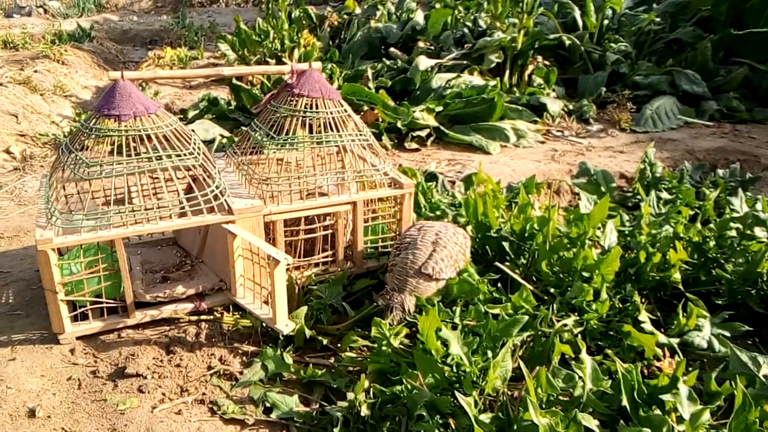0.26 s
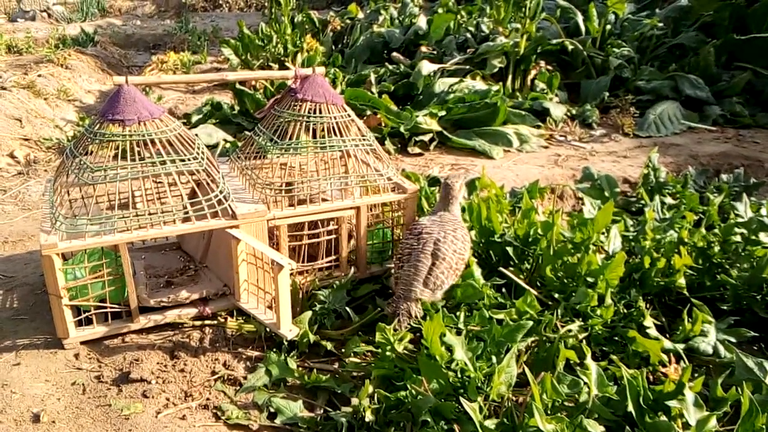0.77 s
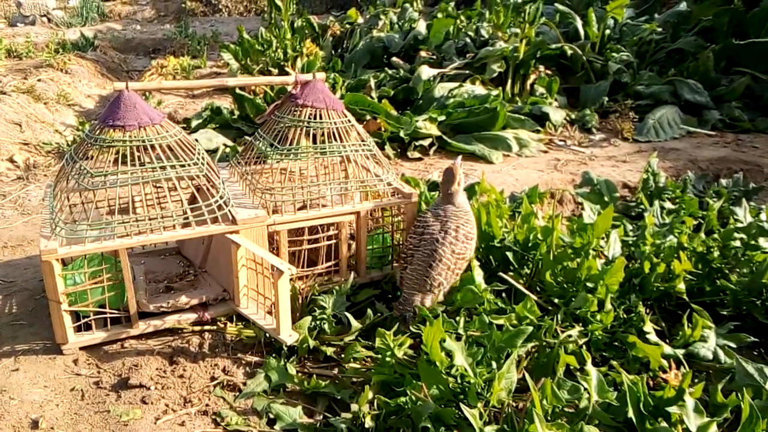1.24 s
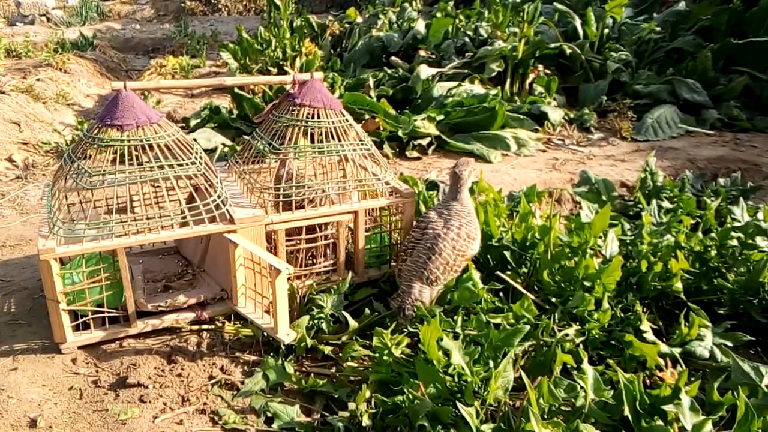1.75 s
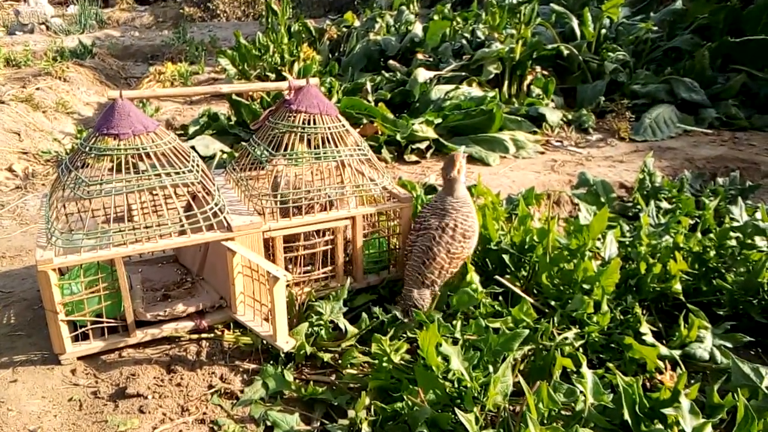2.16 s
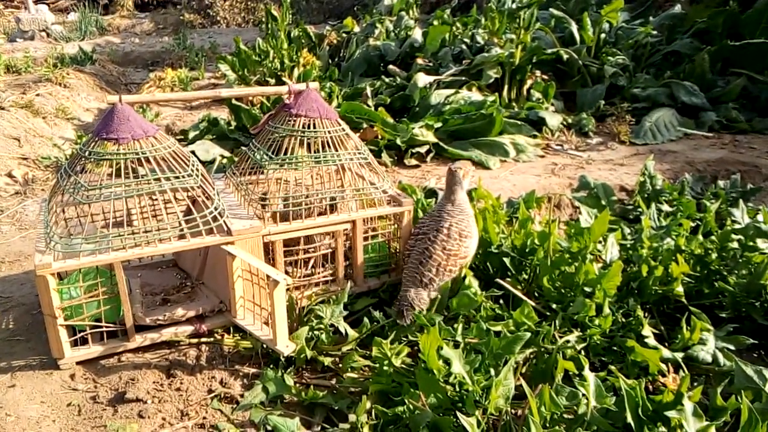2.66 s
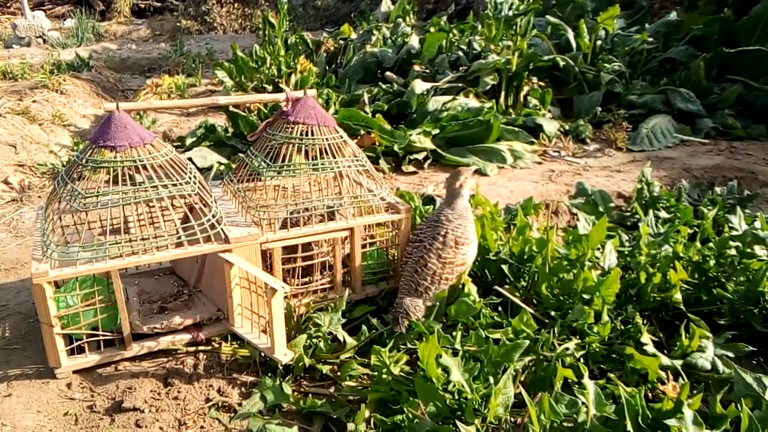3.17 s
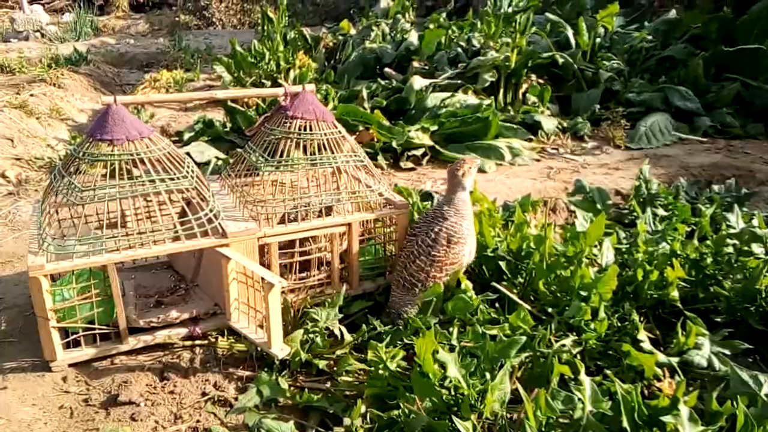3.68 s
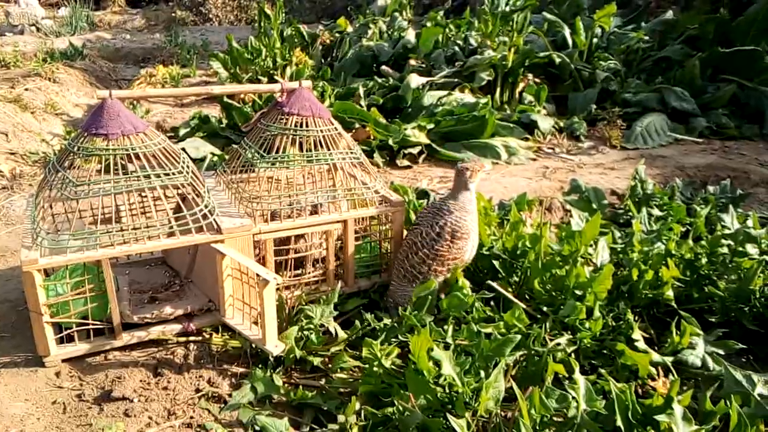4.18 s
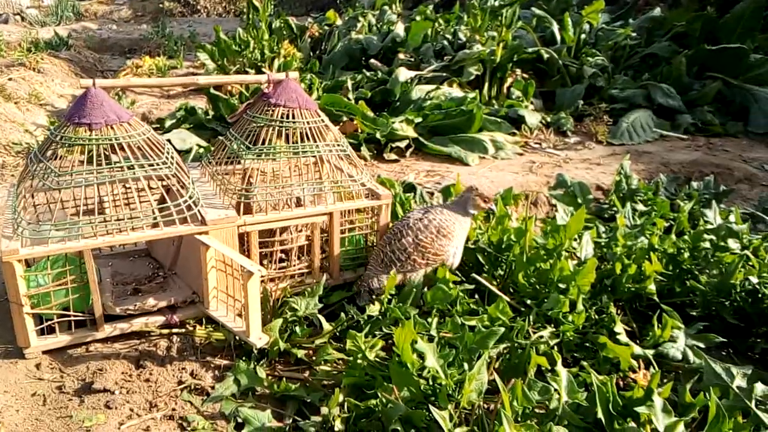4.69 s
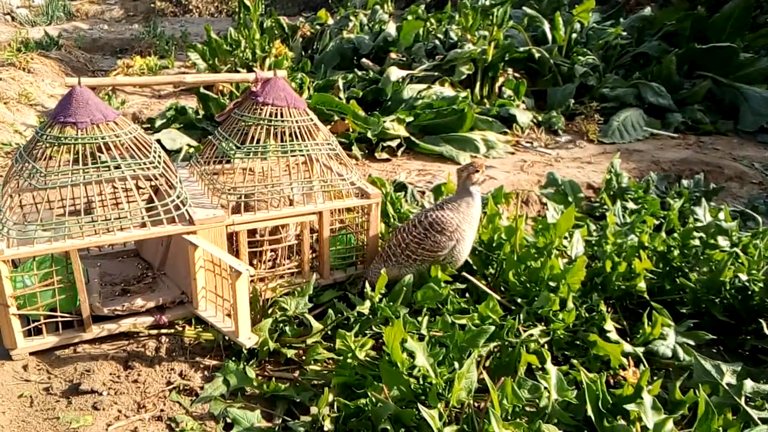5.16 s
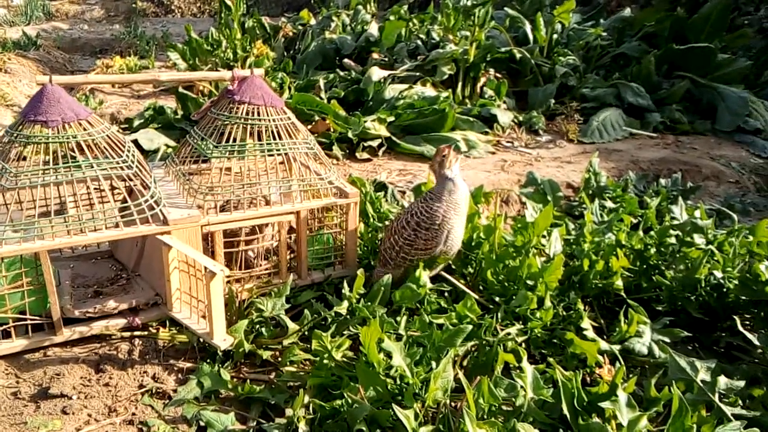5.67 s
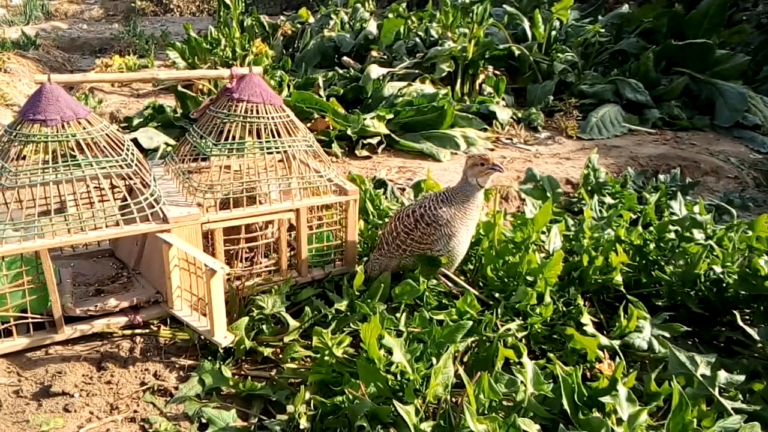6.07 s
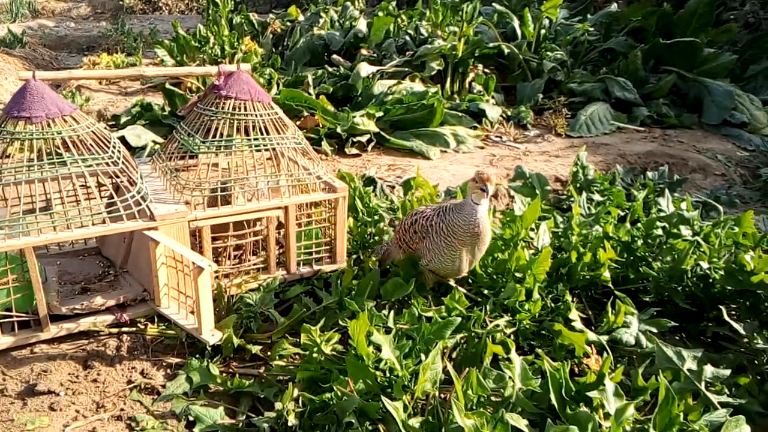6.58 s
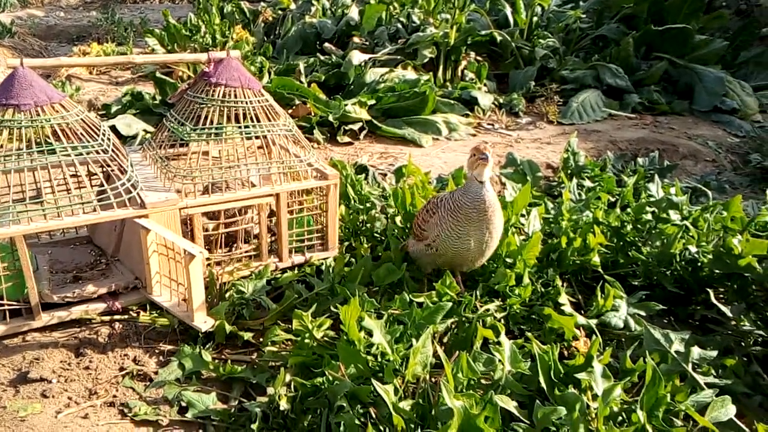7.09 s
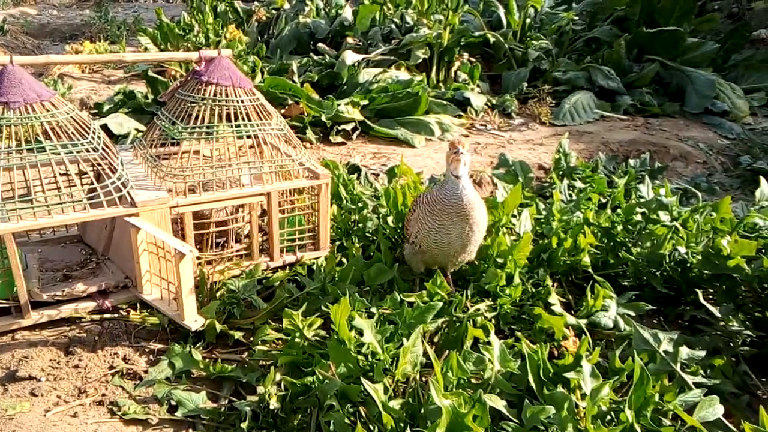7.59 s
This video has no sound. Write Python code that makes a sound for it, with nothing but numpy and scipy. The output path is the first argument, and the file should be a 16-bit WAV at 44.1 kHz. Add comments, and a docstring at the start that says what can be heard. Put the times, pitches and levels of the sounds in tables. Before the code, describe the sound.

A grey francolin calls close by in a vegetable plot. Thin, hissy whines come first, then each loud phrase begins with a shriek cracking between rasp and whistle and tumbles into short rough clucks. The phrases repeat about once a second, mostly led in by a whine. A small dry scuff occurs early. Faint air hiss and low breeze rumble lie beneath, with slight outdoor echo, in mono.

```python
"""A low outdoor rumble and faint air hiss (shaped noise) run throughout, the rumble swelling at about 5 s.
Thin, hissy whines (a tone in noise) come first and recur, most of them leading into a phrase.
From 1.3 s a grey francolin calls in a vegetable plot: each phrase is a shriek flipping between a rasp
(unstable, period-doubled harmonics) and a whistle (nearly pure partials), then two to four arched, rasp-like clucks.
Near 2.3 s something scuffs (noise bursts); wicker cages and the yard return faint echoes (convolution)."""
import sys
import numpy as np
from scipy import signal
from scipy.fft import rfft, irfft
from scipy.io import wavfile
from scipy.ndimage import uniform_filter1d, map_coordinates

SR = 44100
rng = np.random.default_rng(int(sys.argv[2]) if len(sys.argv) > 2 else 0)


def wav_record(signal):
    """Record a signal, one row per channel, as 16-bit PCM in the file named by sys.argv[1]."""
    frames = np.transpose(np.atleast_2d(signal))
    bounded = np.clip(frames, -1, 1)
    # unit amplitude maps onto the largest positive 16-bit level
    quanta = np.round(bounded * 32767).astype(np.int16)
    wavfile.write(sys.argv[1], SR, quanta)


N = 345744
TOP_HZ = 15850  # upper edge of the sound


def undb(db):
    """Logarithmic level: decibels to amplitude gain."""
    return 10 ** (np.asarray(db) / 20)


def curve(table, at):
    """Linear interpolation: the later columns of a table, read along its first."""
    first, *columns = np.transpose(table)
    return [np.interp(at, first, c) for c in columns]


def colour(table, hz):
    """Spectral envelope: gain from (frequency_hz, level_db), straight over log frequency."""
    f, db = np.transpose(table)
    return undb(np.interp(np.log(hz + 1e-9), np.log(f), db))


def noise(table, size):
    """Spectral shaping: white noise given a colour, then scaled to unit spread."""
    spectrum = rfft(rng.standard_normal(size))
    y = irfft(spectrum * colour(table, np.fft.rfftfreq(size, 1 / SR)), size)
    return y / y.std()


def wander(rate, size):
    """Band-limited chance: random values, about `rate` a second, joined by a cubic spline."""
    at = np.arange(size) * rate / SR
    return map_coordinates(rng.standard_normal(int(at[-1]) + 4), [at + 1], order=3, mode="nearest")


def bump(t, at, width):
    """Gaussian envelope: a smooth rise and fall around a point, 0-1."""
    return np.exp(-((t - at) / width) ** 2)


def gate(t, on_s, off_s, attack_s, release_s):
    """Linear envelope: attack, hold and release between two moments, 0-1."""
    return np.clip(np.minimum((t - on_s) / attack_s, (off_s - t) / release_s), 0, 1)


def add(out, start_s, sound):
    """Superposition: mix a sound in at a time."""
    i = int(start_s * SR)
    out[i:i + len(sound)] += sound[:max(N - i, 0)]


# spectrum of the outdoor air: frequency_hz, level_db
AIR_SPECTRUM = [(200, -26), (350, -10.5), (680, -15), (800, -7.5), (950, -14), (1300, -15.5), (4900, -23.5),
                (5800, -19.5), (8500, -37.5), (13500, -37.5), (15100, -21.5), (16000, -20)]
AIR_DB = -67.5
# spectrum of the breeze's rumble: frequency_hz, level_db
RUMBLE_SPECTRUM = [(20, -16.5), (32, -13), (44, 1.5), (70, -1), (87, 5), (105, -3.5), (135, 0.5),
                   (190, -11.5), (260, -16), (420, -12), (700, -28.5), (2000, -87)]
# calm level, then the size, time and width of its one slow swell
RUMBLE_DB, SWELL_DB, SWELL_AT_S, SWELL_WIDTH_S = -65, 5, 5.2, 1.3


def outdoors(gust_db=-0.5, flicker_db=0.5):
    """Broadband noise: faint air hiss over a low rumble that swells with the breeze."""
    swell_db = SWELL_DB * bump(np.arange(N) / SR, SWELL_AT_S, SWELL_WIDTH_S)
    breeze_db = RUMBLE_DB + swell_db + gust_db * wander(3, N)
    air = noise(AIR_SPECTRUM, N) * undb(AIR_DB + wander(0.43, N))
    rumble = noise(RUMBLE_SPECTRUM, N) * undb(breeze_db + flicker_db * wander(5.5, N))
    return air + rumble


# spectrum of the yard's echoes: frequency_hz, level_db
YARD_ECHO = [(200, 19.0), (900, -17.5), (2200, -1.5), (3200, -7), (5000, -4.0), (8000, -7.5), (15000, -26.5)]


def yard(x, echo_db=-21, t60_s=0.43, build_s=0.051):
    """Diffuse reverberation: echoes from cages, plants and walls; the leaves soak up the treble."""
    t = np.arange(int(.7 * SR)) / SR
    decay = np.exp(-np.log(1000) * t / t60_s)
    tail = noise(YARD_ECHO, len(t)) * decay * (1 - np.exp(-t / build_s))
    return x + undb(echo_db) * signal.fftconvolve(x, tail / np.linalg.norm(tail))[:N]


# spectrum of the near scattering: frequency_hz, level_db
CAGE_ECHO = [(300, -5), (1800, -3), (4000, -1), (8000, -14.5), (15000, -17)]


def cages(x, echo_db=-27, delay_s=0.0071, decay_s=.012):
    """Early scattering: wicker cages and nearby leaves return the voice within hundredths of a second."""
    t = np.arange(int(.08 * SR)) / SR
    scatter = noise(CAGE_ECHO, len(t)) * np.exp(-t / decay_s) * (t > delay_s)
    return x + undb(echo_db) * signal.fftconvolve(x, scatter / np.linalg.norm(scatter))[:N]


# scrapes that make up the scuff: peak_s, level_db, rise_s, decay_s
SCRAPES = [(2.337, -46.5, 0.0096, .012), (2.346, -43.5, 0.0035, 0.0087), (2.364, -50, 0.0083, 0.026)]
# spectrum of the scuff: frequency_hz, level_db
SCUFF_SPECTRUM = [(100, -0.5), (400, -6.5), (1200, 3.5), (3000, -1), (6000, -4), (8500, -13), (11000, -5),
                  (13000, -15), (15500, -6)]


def scuffs():
    """Friction noise: a brief, dry, grainy scrape with overlapping exponential pulses of force."""
    t = np.arange(N) / SR
    force = 0
    for peak_s, level_db, rise_s, decay_s in SCRAPES:
        force = force + undb(level_db) * np.exp(-np.maximum((peak_s - t) / rise_s, (t - peak_s) / decay_s))
    return force * noise(SCUFF_SPECTRUM, N) * undb(1.8 * wander(900, N))


# hiss around a whine at 2900 Hz: frequency_hz, level_db
WHINE_HISS = [(400, -22), (1100, -24), (1600, -11.5), (2200, -22.5), (2900, 0.5), (3400, -1.5),
              (4100, -6.5), (4800, -21), (6300, -32.5), (8000, -52.5), (16000, -45.5)]


def thin_whistle(hz, swell, tone_db, hiss_db, overtone_db=-36, waver=0.0063, flutter_db=4.0):
    """Tone with turbulence: a thin, wavering tone wrapped in a hiss that rises with its pitch."""
    size = len(hz)
    phase = 2 * np.pi * np.cumsum(hz * (1 + waver * wander(400, size))) / SR
    # only a low whine has an octave; the stronger the whine, the larger its share
    octave = undb(overtone_db + tone_db + 29.5) * np.sin(2 * phase) * (hz < 3500)
    tone = np.sqrt(2) * (np.sin(phase) + octave) * undb(tone_db + flutter_db * wander(99, size))
    # reading the noise faster shifts its spectrum up
    read_at = np.cumsum(np.sqrt(hz / 2900))
    hiss = map_coordinates(noise(WHINE_HISS, 2 * size), [read_at], order=3) * undb(hiss_db)
    return tone * swell + hiss * swell ** .7


# the held tone scoops up from below (share of its pitch) and flicks up as it ends
WHINE_SCOOP, WHINE_SCOOP_S, WHINE_FLICK_S, WHINE_ATTACK_S, WHINE_RELEASE_S = 0.038, 0.018, 0.034, 0.031, 0.041
# two chirps lead in, the earlier shorter (ratio) and fainter; each rises by a share of its pitch
CHIRP_RISE, CHIRP_OVERLAP_S, CHIRP_HISS_DB, EARLY_CHIRP_DB, EARLY_CHIRP_RATIO = .19, 0.013, -9.5, -12, .8
# whines: held_start_s, length_s, pitch_hz, climb (share of pitch), flick (share of pitch), tone_db, hiss_db,
# chirp_s (length of the later chirp), chirp_hz, chirp_db
WHINES = [(.413, 0.1, 4310, .12, 0.012, -34.5, -47.5, 0.047, 4260, -42),
          (1.133, .129, 4150, 0.0043, 0.012, -39.5, -43.5, .036, 3900, -36.5),
          (2.005, 0.13, 2905, 0.065, 0.0064, -31.5, -40, 0.045, 2980, -37.5),
          (2.898, 0.21, 2616, 0.04, 0.37, -45, -42, .05, 2840, -36),
          (3.916, .14, 3033, 0.042, .005, -38, -35, .036, 3366, -38),
          (4.859, .15, 2863, 0.036, 0.0057, -25.5, -37.5, 0.029, 2940, -32),
          (5.764, .162, 2782, 0.028, 0.064, -34, -39.5, 0.026, 2990, -41),
          (6.557, .17, 2785, 0.004, 0.017, -27, -37.5, 0.027, 2890, -33.5),
          (7.527, 0.15, 2817, 0.019, 0.15, -33.5, -43, 0.037, 3030, -41)]


def whines(flick_db_per_share=50):
    """Frequency modulation: two upward chirps, then a held tone that climbs and flicks up, louder, at its end."""
    out = np.zeros(N)
    for start_s, length_s, pitch_hz, climb, flick, tone_db, hiss_db, chirp_s, chirp_hz, chirp_db in WHINES:
        t = np.arange(0, length_s, 1 / SR)
        lift = flick * np.exp((t - length_s) / WHINE_FLICK_S)
        scoop = WHINE_SCOOP * np.exp(-t / WHINE_SCOOP_S)
        hz = pitch_hz * (1 + climb * (t / length_s - .5) - scoop + lift)
        swell = gate(t, 0, length_s, WHINE_ATTACK_S, WHINE_RELEASE_S)
        add(out, start_s, thin_whistle(hz, swell, tone_db + flick_db_per_share * lift, hiss_db))
        # chirps are placed backwards from the held tone
        early = (chirp_s * EARLY_CHIRP_RATIO, chirp_db + EARLY_CHIRP_DB)
        for span_s, db in [(chirp_s, chirp_db), early]:
            start_s = start_s - span_s + CHIRP_OVERLAP_S
            u = np.linspace(0, 1, int(span_s * SR))
            hz = chirp_hz * (1 + CHIRP_RISE * (u - .5))
            add(out, start_s, thin_whistle(hz, abs(np.sin(np.pi * u)), db, db + CHIRP_HISS_DB))
    return out


# the bird turns relative to the listener: time_s, top_octave_db
FACING = [(0, 6.5), (3.5, -5.5), (5, -2.5), (6, 2), (7.8, 1)]


def beam(x, edge_hz=9500):
    """Directivity: the highest treble leaves the beak in a narrow beam, so it varies as the bird turns."""
    facing_db, = curve(FACING, np.arange(N) / SR)
    top = signal.sosfiltfilt(signal.butter(4, edge_hz, "high", fs=SR, output="sos"), x)
    return x + (undb(facing_db) - 1) * top


def syrinx(hz, odd_db, rough, beak_hz, treble_db, throat, jitter, sharpness, flutter_db, count=26):
    """Source and filter: a period-doubled voice with weaker odd harmonics, coloured by throat and open beak."""
    size = len(hz)
    wobble = jitter * rough * wander(700, size) + .014 * wander(150, size)
    phase = 2 * np.pi * np.cumsum(hz * (1 + wobble)) / SR
    voice, power = 0, 0
    for k in range(1, count + 1):
        f = k * hz
        beak = 1 / (1 - (f / beak_hz) ** 2 + 1j * f / beak_hz / sharpness)
        treble = undb(treble_db * np.clip(np.log2(f / 1700), 0, 1.5))
        # the two sides of the syrinx lock loosely: partials swell and break up, the odd ones slip most
        flutter = undb(flutter_db * wander(134, size))
        gain = colour(throat, f) * beak * treble * (f < TOP_HZ) * flutter
        slip = (.08 + .4 * (k % 2) + .05 * k) * wander(140, size)
        line = undb(odd_db * (k % 2))
        # uneven cycles smear the lines, the high ones most
        smear = rough * np.minimum(.3 + (f / 3400) ** 2, 4)
        chaos = (wander(520, size) + 1j * wander(520, size)) / np.sqrt(2)
        partial = gain * (line + smear * chaos) / np.sqrt(1 + smear ** 2)
        voice = voice + partial * np.exp(1j * (k * phase + slip + rng.uniform(0, np.pi)))
        power = power + abs(gain) ** 2 * (line ** 2 + smear ** 2) / (1 + smear ** 2) / 2
    # single cycles come out stronger or weaker: the grain of the rasp
    shimmer = undb(2 * rough * wander(650, size))
    level = np.sqrt(uniform_filter1d(power, size=600))
    return voice.real / level * shimmer * signal.windows.tukey(size, .07)


# throat resonances in a cluck: frequency_hz, level_db
CLUCK_THROAT = [(250, -14), (480, -11.5), (640, -23.5), (980, -4), (1350, -5), (1550, -7), (1830, -3),
                (2250, -9.5), (2900, -0.5), (3400, -5.5), (4000, -0.5), (5100, -11.5), (6300, -9.5),
                (7400, -24.5), (8300, -31), (13000, -24.5), (15000, -7.5)]
# a cluck is one arch of effort; at its feet the voice is lower, weaker and rougher than at its top
FOOT_PITCH_RATIO, FOOT_DB, TOP_DB, FOOT_ROUGH, TOP_ROUGH = .5, -17.5, 2, .72, .25
# the beak is widest early in a cluck (share of its length), then closes; its resonance follows (ratios)
GAPE_AT, GAPE_RATIO, GAPE_CLOSING = 0.3, 1.149, 0.46
# kinds of cluck by effort: top_pitch_hz, top_place (0-1 of length), beak_hz (before the gape),
# odd_harmonics_db, roughness (ratio)
EFFORT = [(392, .37, 1176, -16, .58), (478.6, .62, 1470, -1.5, .75), (611, .62, 1820, -3, 1.2),
          (698.5, .59, 2014, -6, 1.2)]
# clucks: start_s, length_s, top_pitch_hz (stands for the effort), level_db
CLUCKS = [(1.552, .085, 602, -22.5), (1.68, 0.074, 489, -24), (1.814, 0.077, 370, -30),
          (1.985, 0.031, 451, -41), (2.381, 0.084, 683, -21), (2.514, 0.075, 604.5, -22),
          (2.646, 0.073, 500, -24), (2.787, 0.075, 347.3, -35), (3.524, 0.079, 687, -20.5),
          (3.658, 0.08, 613, -21.5), (3.794, 0.075, 460.4, -26), (4.316, 0.085, 710, -20.5),
          (4.454, 0.082, 644, -22), (4.592, .071, 548, -23.5), (4.738, 0.08, 418.4, -35),
          (5.223, 0.082, 693, -20), (5.357, 0.081, 643, -22), (5.5, .074, 518, -23.5),
          (5.948, 0.079, 695, -19), (6.081, 0.078, 636, -21.5), (6.219, 0.071, 517, -23),
          (6.975, 0.076, 662, -20), (7.107, 0.075, 596, -21.5), (7.257, 0.072, 419.4, -27.5),
          (7.699, 0.078, 690, -21), (7.832, 0.076, 613, -16.5)]


def clucks(treble_db_per_octave=19, steepness=1.99, split_db=7, split_at=.9, split_width=0.095):
    """Effort scaling: in short arched notes, the lower the top pitch, the less the beak opens and the duller."""
    out = np.zeros(N)
    for start_s, length_s, top_hz, level_db in CLUCKS:
        top_at, beak_hz, odd_db, rough_ratio = curve(EFFORT, top_hz)
        u = np.linspace(0, 1, int(length_s * SR))
        arch = np.sin(np.pi * np.interp(u, [0, top_at, 1], [0, .5, 1]))
        slack = np.clip(1 - arch, 0, 1)
        hz = top_hz * (1 - (1 - FOOT_PITCH_RATIO) * slack)
        db = TOP_DB + (FOOT_DB - TOP_DB) * slack ** steepness
        rough = rough_ratio * (TOP_ROUGH + (FOOT_ROUGH - TOP_ROUGH) * slack)
        beak_hz = beak_hz * (GAPE_RATIO - GAPE_CLOSING * abs(u - GAPE_AT))
        treble_db = treble_db_per_octave * np.log2(beak_hz / 2150)
        # on the way down the voice splits and its odd harmonics come out
        odd_db = odd_db + split_db * bump(u, split_at, split_width)
        note = syrinx(hz, odd_db, rough, beak_hz, treble_db, CLUCK_THROAT,
                      jitter=0.055, sharpness=4.78, flutter_db=3.0)
        add(out, start_s, note * undb(level_db + db))
    return out


# rasp before each shriek's own pitch ratio and level: pitch, level, roughness (0-1); it starts low and
# rough, and sags until the whistle takes over
RASP_HZ, RASP_DB, RASP_ROUGH = 1323, -18.5, .31
RASP_ATTACK_S, RASP_SCOOP_HZ, RASP_ATTACK_DB = 0.0085, 302, -8.5
RASP_SAG_HZ_PER_S, RASP_SAG_DB_PER_S = 2000, 65
# one surge of effort early in the rasp lifts pitch and level
SURGE_AT_S, SURGE_WIDTH_S, SURGE_HZ, SURGE_DB = .0215, .006, 220, 5
# the rasp cracks at each flip: higher, louder, rougher
CRACK_LEAD_S, CRACK_WIDTH_S, CRACK_HZ, CRACK_DB, CRACK_ROUGH = .002, .004, 192, 6, 0.59
# the closing rasp drops away from under the whistle
CLOSING_S, CLOSING_HZ, CLOSING_DROP_HZ = .028, 1443, 760
CLOSING_DB, CLOSING_FADE_DB, CLOSING_ROUGH = -19.5, -15, 0.97
# the syrinx flips register at the same moments of every shriek: after_start_s
FLIPS = [0, .051, .069, .093]


def rasp(t, length_s, whistling, leak_db=-26, beak_hz=2720, shut_beak_hz=1700,
         treble_db=-1.0, closing_treble_db=-7, shut_treble_db=-6):
    """Register instability: the rough voice surges, sags, cracks at each flip and drops as the beak shuts."""
    onset = np.exp(-t / RASP_ATTACK_S)
    surge = bump(t, SURGE_AT_S, SURGE_WIDTH_S)
    crack = sum(bump(t, flip - CRACK_LEAD_S, CRACK_WIDTH_S) for flip in FLIPS[1:])
    hz = RASP_HZ - RASP_SAG_HZ_PER_S * t - RASP_SCOOP_HZ * onset + SURGE_HZ * surge + CRACK_HZ * crack
    db = RASP_DB - RASP_SAG_DB_PER_S * t + RASP_ATTACK_DB * onset + SURGE_DB * surge + CRACK_DB * crack
    rough = RASP_ROUGH + CRACK_ROUGH * (crack + onset)
    shut = np.clip((t - length_s) / CLOSING_S, 0, 1)
    closing = t > (FLIPS[-1] + length_s) / 2
    hz = np.where(closing, CLOSING_HZ - CLOSING_DROP_HZ * shut, hz)
    # a little rasp leaks through the whistle
    db = np.where(closing, CLOSING_DB + CLOSING_FADE_DB * shut, db) + leak_db * whistling
    rough = np.where(closing, CLOSING_ROUGH, rough)
    beak_hz = beak_hz + (shut_beak_hz - beak_hz) * shut
    treble_db = treble_db + closing_treble_db * closing + shut_treble_db * shut
    return hz, db, rough, beak_hz, treble_db


# the whistle holds its pitch, then falls ever faster (share of the fall to a power)
WHISTLE_HZ, WHISTLE_FALL_HZ, WHISTLE_FALL_POWER = 2480.5, 387, 1.9
DIP_WIDTH_HZ = 50  # its level dips once on the way, over a narrow range of pitch
# throat resonance that the whistle slides through: pitch_hz, level_db
WHISTLE_THROAT = [(2000, -23), (2100, -16), (2210, -14), (2350, -15), (2500, -16)]
# whistle partials: multiple (of the pitch), level_db
WHISTLE_PARTIALS = [(.5, -44.5), (1, -1), (1.5, -33.5), (2, -17), (3, -27), (4, -51.5), (5, -52),
                    (6, -45.5)]


def whistle(t, length_s, dip_hz, dip_db, top_db=-9, flutter_db=1.0, jitter=0.0045, waver=0.0016):
    """Additive synthesis: weak partials flutter around a steady main line and fade as the pitch falls."""
    size = len(t)
    fall = np.clip((t - FLIPS[-1]) / (length_s - FLIPS[-1]), 0, 1)
    hz = WHISTLE_HZ - WHISTLE_FALL_HZ * fall ** WHISTLE_FALL_POWER
    unsteady = jitter * wander(650, size) + waver * wander(70, size)
    phase = 2 * np.pi * np.cumsum(hz * (1 + unsteady)) / SR
    tone = 0
    for multiple, partial_db in WHISTLE_PARTIALS:
        weak = min(abs(multiple - 1), 2)  # zero for the main line
        change_db = weak * (flutter_db * wander(300, size) + top_db * fall / 2)
        tone = tone + undb(partial_db + change_db) * np.sin(multiple * phase)
    dip = undb(dip_db * bump(hz, dip_hz, DIP_WIDTH_HZ))
    return np.sqrt(2) * tone * colour(WHISTLE_THROAT, hz) * dip


# throat resonances in the rasp: frequency_hz, level_db
RASP_THROAT = [(300, -38.5), (600, -22), (1200, -6), (1750, -7), (2300, -12), (2900, -2), (3400, -12),
               (3850, -2.5), (5000, -8.5), (7200, -10), (8100, -39.5), (11000, -29.5), (13800, -19.5),
               (15000, -9)]
# shrieks: start_s, length_s (to the end of the falling whistle), rasp_db, first_whistle_db,
# falling_whistle_db, rasp_pitch (ratio), dip_hz (pitch at which the whistle dips), dip_db
SHRIEKS = [(1.283, 0.15, -.5, -2, -2.5, .96, 2335, -2.5), (2.108, 0.15, -1.5, 2.5, 0.5, 0.95, 2310, -15.5),
           (3.25, 0.15, -1.5, 2, 2, 0.95, 2378, -11.5), (4.034, 0.15, -2, 2.5, 1.5, 0.97, 2394, -4),
           (4.933, 0.16, -3, 2, 3, 0.98, 2260, -10.5), (5.657, .153, -2, 3, 2.5, 1.01, 2330, -7),
           (6.691, 0.15, -0.5, 4, 3, .96, 2420, -10), (7.402, 0.16, -0.5, 1, 3, .99, 2438, -11.5)]


def shrieks(lead_s=0.0028, lag_s=0.00067, attack_s=.005, release_s=0.0036,
            end_lag_s=0.0016, end_release_s=.007, fade_s=0.0078, odd_db=-12):
    """Register jumps: the loud note flips twice from a rasp to a whistle about an octave above."""
    out = np.zeros(N)
    for start_s, length_s, rasp_db, first_db, falling_db, ratio, dip_hz, dip_db in SHRIEKS:
        t = np.arange(0, length_s + CLOSING_S, 1 / SR)
        first = gate(t, FLIPS[1] - lead_s, FLIPS[2] + lag_s, attack_s, release_s)
        falling = gate(t, FLIPS[-1] - lead_s, length_s + end_lag_s, attack_s, end_release_s)
        hz, db, rough, beak_hz, treble_db = rasp(t, length_s, (first + falling) ** 2)
        # half the pitch: the period is doubled
        voice = syrinx(hz * ratio / 2, odd_db, rough, beak_hz, treble_db, RASP_THROAT,
                       jitter=0.063, sharpness=2.5, flutter_db=3.5)
        add(out, start_s, voice * undb(db + rasp_db) * np.minimum((t[-1] - t) / fade_s, 1))
        whistle_gain = first * undb(first_db) + falling * undb(falling_db)
        add(out, start_s, whistle(t, length_s, dip_hz, dip_db) * whistle_gain)
    return out


def scene():
    """Superposition: calls, whines and scuff in the yard, over the outdoor noise, in mono."""
    calls = cages(beam(shrieks() + clucks()))
    return (yard(calls + whines() + scuffs()) + outdoors())[None]


def record(dry):
    """Band limiting: a steep elliptic low-pass cuts the top."""
    return signal.sosfilt(signal.ellip(10, .2, 70, TOP_HZ, fs=SR, output="sos"), dry)


dry = scene()
out = record(dry)
wav_record(out)
```